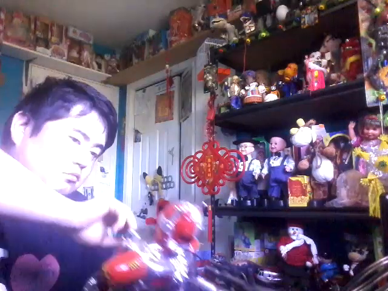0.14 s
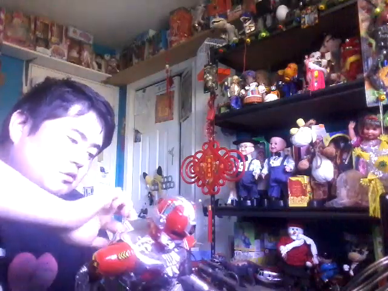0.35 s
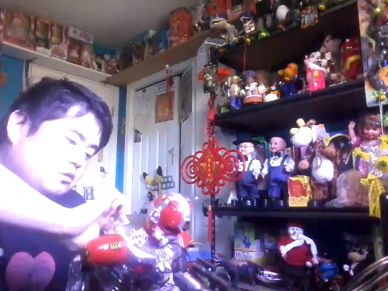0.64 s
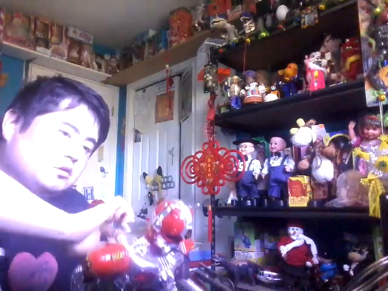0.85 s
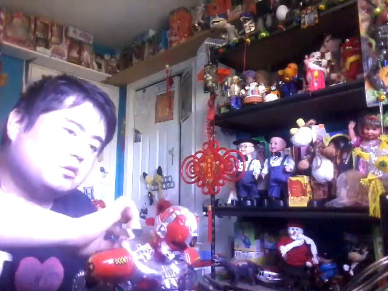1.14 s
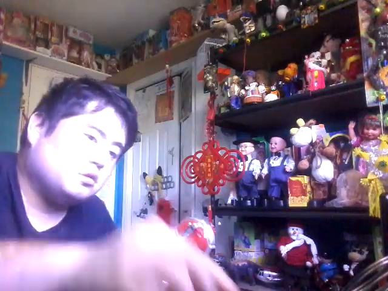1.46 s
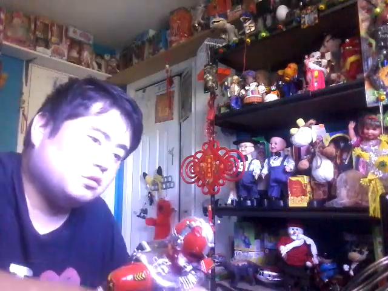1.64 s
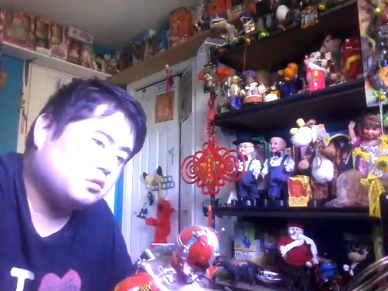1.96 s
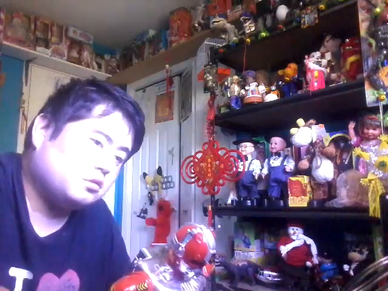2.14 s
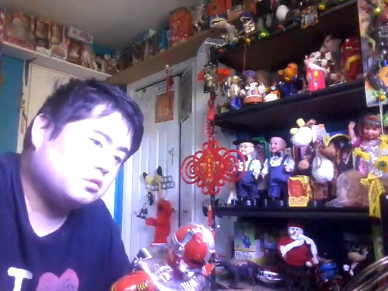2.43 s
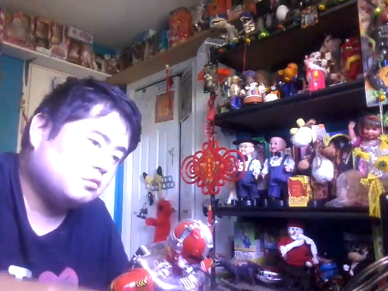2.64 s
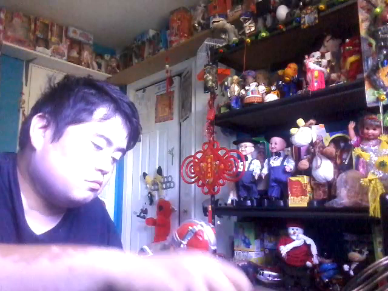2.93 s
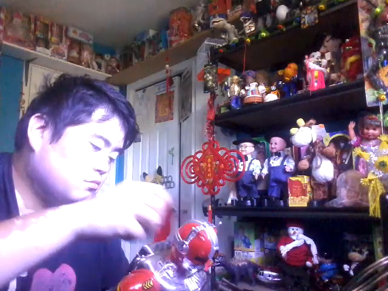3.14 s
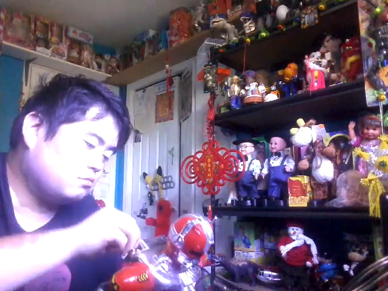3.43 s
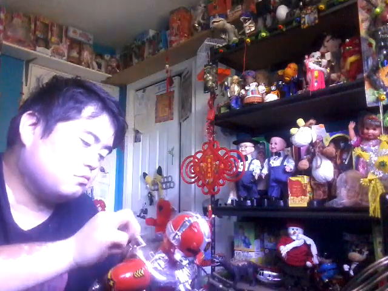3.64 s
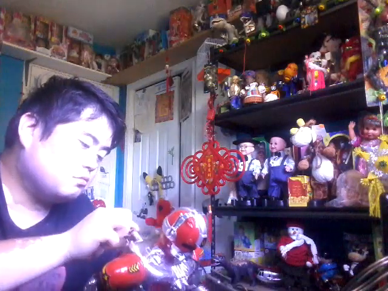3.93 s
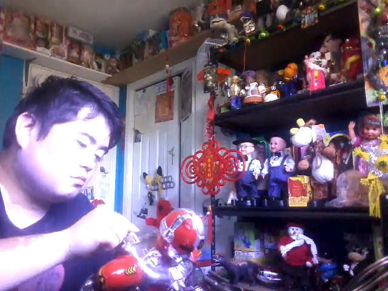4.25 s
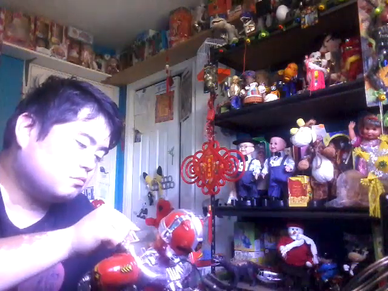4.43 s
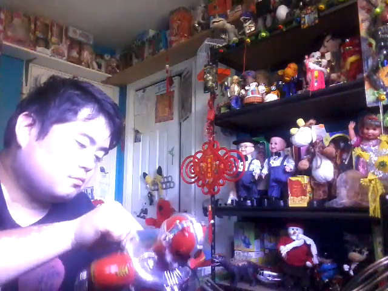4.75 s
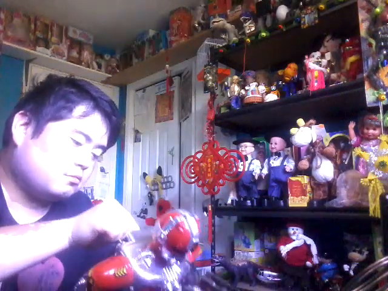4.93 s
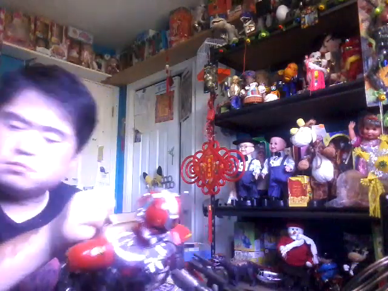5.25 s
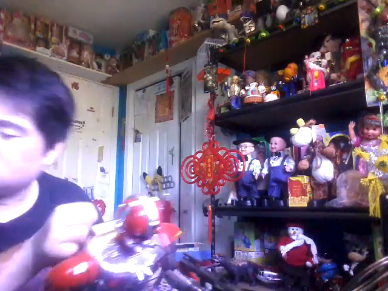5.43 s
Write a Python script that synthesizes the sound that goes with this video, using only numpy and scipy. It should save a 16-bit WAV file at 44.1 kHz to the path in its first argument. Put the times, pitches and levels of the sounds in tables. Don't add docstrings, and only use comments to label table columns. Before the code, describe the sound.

Close plastic snaps, clacks and small springy ticks at a desk, with a brief knocking roll midway and constant whirring fan noise.

```python
import sys
import numpy as np
from scipy import signal
from scipy.fft import rfft, irfft, next_fast_len
from scipy.io import wavfile

SR = 44100
rng = np.random.default_rng(int(sys.argv[2]) if len(sys.argv) > 2 else 0)


def gain_from_db(level_db):
    decades = np.asarray(level_db, float) / 20
    return 10 ** decades


def unload_audio(sound):
    columns = np.transpose(np.atleast_2d(sound))
    steps = np.round(np.clip(columns, -1, 1) * 32767)
    wavfile.write(sys.argv[1], SR, steps.astype(np.int16))


N = 246283

# freq_hz, density_db_per_hz
SIDE_HISS = [(59, -35), (100, -6), (818, -7.5), (1950, -4.5), (2220, -2), (2690, -2.5), (8640, -12),
             (16000, -12)]
SIDE_DB = -77
# freq_hz, density_db_per_hz
AIR = [(35, -27), (60, -14), (130, -9), (400, -10), (620, -7), (810, -3), (980, -11), (2250, -13),
       (3500, -18.5), (6650, -26.5), (8000, -22.5), (9200, -24), (10500, -46), (15000, -34.5)]
AIR_DB = -52
# time_s, speed_turns_per_s
SHAFT = [(0, 38.31), (2.7, 38.47), (4, 38.55), (5.6, 38.6)]
TONE_ORDERS = [(0, 3), (1, 0), (1, 1), (1, 2), (2, -1), (0, 6), (2, 1), (0, 9), (3, 0), (3, 1), (3, 2),
               (4, -1), (0, 12),
               (4, 2), (5, -1), (0, 16), (6, -1), (5, 3), (0, 21), (0, 54), (0, 58), (0, 60), (0, 2.627),
               (2, 0)]
TONE_DB = [-65, -60.5, -64, -73.5, -68.5, -72, -74, -60, -68.5, -72, -67.5, -65.5, -65, -80, -69, -73,
           -72.5, -68.5, -59, -70, -76, -65, -77.5, -73]
WHINE_DB, WHINE_SAG_DB_PER_S = -59.5, 1.7
WHINE_DROPS_S, WHINE_LOSS_DB, WHINE_FADE_S = 3.3, 15, .6
TURN_S, TURN_DB, TURN_SWELL_DB_PER_S, TURN_EASE_DB_PER_S = 5.45, -72, 12, 25

# freq_hz, t60_s
ROOM_T60_S = [(300, 0.29), (1500, 0.2), (5000, 0.22), (10000, 0.26), (15000, 0.14)]
# freq_hz, level_db
ROOM_TINT_DB = [(200, 2), (1000, 5.5), (3000, 8.5), (6500, 3.5), (9000, 4), (11000, 7.5), (15000, 4)]
PORT_HZ, SHELF_HZ = 9900, 12100

ROLL_S = [
    1.93,
    2.1,
    2.24,
    2.42,
]
RUMBLE_DB, RUMBLE_SWING_DB = -40.5, 6
SCRAPE_DB, SCRAPE_SWING_DB = -46, 30
# freq_hz, level_db, t60_s
RUMBLE_MODES = [(122, -5, 0.063), (218, -1, 0.09), (343.3, 1.5, 0.29), (480, -15, 0.019), (635, -6, 0.051),
                (800, -11, 0.035)]
# freq_hz, level_db, t60_s
DESK_MODES = [(260, -19, .02), (345, 11, 0.017), (545, 4, 0.096), (643, 8.5, 0.03), (870, 7, 0.016),
              (1080, 6, 0.059), (1280, 15, 0.0015), (2040, 11, 0.0096), (2020, -4, 0.021),
              (2630, -27, 0.0052), (3370, -6, 0.0017), (5000, -3.5, 0.002), (6400, -2.5, 0.0017),
              (8900, -7, 0.0033)]
# freq_hz, level_db, t60_s
SPRING_MODES = [(620, -11, 0.017), (1010, -9, 0.073), (1940, 4, 0.0054), (2780, 4, 0.011), (3310, 2, .01),
                (4050, 6, 0.0021), (5150, 2.5, 0.012), (5950, -0.5, 0.0092), (6230, 2, 0.0034),
                (8020, 12, 0.0033), (8830, 6.5, 0.012), (10400, 2, .002), (13800, -12, 0.0022)]
# freq_hz, level_db, t60_s
SHELL_MODES = [(413, -1.5, 0.029), (562, -16.5, 0.14), (720, 0, 0.023), (850, -1.5, 0.053),
               (1040, 0, 0.042), (1280, 4, 0.011), (1674, 5.5, 0.016), (1684, 4.5, 0.024), (1885, 2, 0.013),
               (2330, 11.5, 0.0021), (2590, 4.5, 0.0053), (3620, 8.5, 0.0028), (3785, 6.5, 0.0057),
               (5100, 4.5, 0.0063), (5110, 2.5, 0.012), (5740, 10.5, 0.0011), (8300, 18.5, 0.0014),
               (8050, 11, 0.0025), (8800, -10, 0.002), (11300, -11, 0.00033), (13600, 3, 0.0014),
               (16330, 7, 0.0033)]

# low_hz, high_hz
REGIONS_HZ = [(330, 1200), (1200, 3000), (3000, 17000)]
HARD_HZ = 14000
DULLING = 0.44
# region_peaks_re_strength_db, region_change_db_per_db_hardness, chatter_ms
KNOCK = ((0, 0, -6.5), (-0.55, 0.52, 0.32), .5)
THUD = ((0, -19.5, -22), (0, 0, 1), 4.9)
TICK = ((0, -19, 0), (-0.35, 0, 0), 4.3)
CLACK = ((0, 0, -11.5), (-1.45, 0, 0.59), 3.2)
SNAP = ((1.3, 0, 0), (-1.01, 0, 0.84), 4.55)
# start_s, strength_db, hardness_db, main_ring_hz
KNOCKS = [(1.9509, -44, -22, 770), (1.9634, -42, 18.5, 670), (1.9834, -44, -15, 594),
          (2.0006, -32.5, 7, 735), (2.0104, -34.5, -8, 780), (2.0224, -44, -12, 850),
          (2.0467, -37, -10, 720), (2.0645, -25, 1, 1050), (2.0715, -39, 3, 1100),
          (2.0892, -28.5, -9, 1080), (2.1065, -35, 0, 380), (2.1222, -40.5, 21, 1860),
          (2.1313, -38.5, 12, 1820), (2.1697, -37, -7, 1500), (2.184, -35, 11, 1490),
          (2.1945, -31.5, 1, 940), (2.23, -35.5, -1.5, 910), (2.24, -38, 7, 826), (2.2533, -47, -7, 384),
          (2.2845, -28.5, 6, 1300), (2.332, -36, 6, 1700), (2.3408, -32.5, 4, 920), (2.356, -65, -18, 345),
          (2.4956, -38.5, 3, 910), (2.6894, -50.5, -13, 800)]
# start_s, strength_db, hardness_db, main_ring_hz
THUDS = [
    (1.0486, -46, 33, 1010),
    (3.3374, -38, 7, 430),
    (3.6795, -33, 12, 480),
    (3.6863, -39, 3, 1020),
    (3.7018, -34.5, 11, 840),
    (3.8876, -47, 8, 850),
    (4.4414, -50, 9, 1080),
    (4.9794, -41, 16, 660),
    (5.4465, -35.5, 10, 720),
    (5.5554, -38, 0, 835),
]
# start_s, strength_db, hardness_db, main_ring_hz
TICKS = [(.4334, -46, 7, 5000), (.7195, -34.5, 13, 4570), (.7497, -37, 5.5, 5340), (.9918, -33.5, 19, 5500),
         (1.0014, -38, 12, 2900), (1.01, -31.5, 16, 5150), (1.029, -35, 10, 5370), (1.0622, -32, 18, 5070),
         (1.4962, -35.5, 25, 5700), (4.227, -44, 6, 3300), (4.2552, -37, 19, 4970),
         (5.335, -42.5, 20, 8300), (5.5333, -41, 10, 4700)]
# start_s, strength_db, hardness_db, main_ring_hz
CLACKS = [(3.5937, -24, 7, 1570), (3.5985, -27.5, 5, 1790), (3.645, -28.5, 7.5, 1810),
          (3.6565, -27, 3.5, 1770), (4.058, -39.5, 2, 990), (4.2195, -38.5, 16, 980),
          (4.3258, -32, 20, 3240), (4.3867, -37, 8, 1130), (4.4785, -28.5, -3, 944),
          (4.7076, -30, 7.5, 2040), (4.784, -40, 17, 1010), (5.5675, -34.5, 26.5, 2100)]
# start_s, strength_db, hardness_db, main_ring_hz
SNAPS = [(.1417, -28, 5.5, 4900), (.2607, -15, 12, 1680), (.3994, -44.5, 0.5, 800),
         (3.1467, -39, -0.5, 1080), (3.156, -47.5, -5.5, 1080), (3.2991, -28, -3.5, 2150),
         (4.3938, -30, 9.5, 2120), (4.4668, -25.5, 3, 1000), (4.4715, -25, 8, 750),
         (4.4845, -26, 17.5, 4550), (4.5551, -38, 3, 2280), (4.6982, -42, 9, 1040)]


def at_hz(points, hz):
    table_hz, value = np.transpose(points)
    return np.interp(np.log(hz), np.log(table_hz), value)


def in_time(rows):
    return np.interp(np.arange(N) / SR, *np.transpose(rows))


def drift(rate_hz):
    hop = 40
    pole = np.exp(-2 * np.pi * rate_hz * hop / SR)
    noise = rng.standard_normal(N // hop + 2002)
    slow = signal.lfilter([1], [1, -2 * pole, pole * pole], noise)[2000:]
    return np.interp(np.arange(N) / hop, np.arange(len(slow)), slow / slow.std())


def coloured(spectrum):
    size = next_fast_len(N)
    hz = np.maximum(np.arange(size // 2 + 1) * SR / size, 1)
    white = rfft(rng.standard_normal(size))
    noise = irfft(white * gain_from_db(at_hz(spectrum, hz)), size)[:N]
    return noise / noise.std()


def ring(force, hz, t60_s):
    r = gain_from_db(-60 / (t60_s * SR))
    w = 2 * np.pi * hz / SR
    return signal.lfilter([0, np.sin(w)], [1, -2 * r * np.cos(w), r * r], force + 1e-18)


def room(x):
    size = SR // 2
    t = np.arange(size) / SR
    edges_hz = 150 * 2. ** np.arange(0, 7, .5)
    tail = 0
    for low_hz, high_hz in zip(edges_hz, edges_hz[1:]):
        band_pass = signal.butter(2, [low_hz, high_hz], "band", fs=SR, output="sos")
        band = signal.sosfilt(band_pass, rng.standard_normal(size))
        hz = np.sqrt(low_hz * high_hz)
        decay_db = at_hz(ROOM_TINT_DB, hz) - 60 * t / at_hz(ROOM_T60_S, hz)
        tail = tail + band * gain_from_db(decay_db)
    tail = tail * np.clip((t - .001) / 0.00043, 0, 1)
    return signal.fftconvolve(x, tail / np.sqrt(np.sum(tail ** 2)))[:N]


def capsule(x):
    x = signal.sosfilt(signal.butter(2, 260, "high", fs=SR, output="sos"), x)
    x = signal.sosfilt(signal.cheby2(10, 50, 16600, fs=SR, output="sos"), x)
    poles = signal.butter(5, PORT_HZ, fs=SR, output="zpk")[1]
    zeros = signal.butter(5, SHELF_HZ, fs=SR, output="zpk")[1]
    unity_gain = np.real(np.prod(1 - poles) / np.prod(1 - zeros))
    return signal.sosfilt(signal.zpk2sos(zeros, poles, unity_gain), x)


def fan_air():
    top = signal.cheby2(10, 50, 16300, fs=SR, output="sos")
    noise = signal.sosfilt(top, coloured(AIR))
    low = signal.sosfilt(signal.butter(1, 1200, fs=SR, output="sos"), noise)
    low_gusts = low * gain_from_db(1.3 * drift(10))
    high_gusts = (noise - low) * gain_from_db(.5 * drift(11.0))
    return gain_from_db(AIR_DB) * (low_gusts + high_gusts)


def fan_tones():
    t = np.arange(N) / SR
    turns = np.cumsum(in_time(SHAFT) + 0.017 * drift(1.43)) / SR
    left = np.clip((t - WHINE_DROPS_S) / WHINE_FADE_S, 0, 1)
    whine_db = WHINE_DB - WHINE_SAG_DB_PER_S * t - WHINE_LOSS_DB * left
    out = gain_from_db(whine_db + 1.5 * drift(5.0)) * np.sin(2 * np.pi * 57 * turns)
    for (hum, order), db in zip(TONE_ORDERS, TONE_DB):
        waver_db = 0.57 * drift(2.5) * (order != 0)
        cycles = 119.9 * hum * t + order * turns + rng.random()
        out += gain_from_db(db + waver_db) * np.sin(2 * np.pi * cycles)
    return np.sqrt(2) * out


def rustle():
    grains = rng.standard_normal(N) * (rng.random(N) < 3000 / SR)
    bright = signal.butter(1, [2500, 12000], "band", fs=SR, output="sos")
    grains = signal.sosfilt(bright, grains)
    late_s = np.arange(N) / SR - TURN_S
    swell_db = TURN_DB + np.minimum(TURN_SWELL_DB_PER_S * late_s, -TURN_EASE_DB_PER_S * late_s)
    return gain_from_db(swell_db + 3.1 * drift(12.0)) * grains / grains.std()


def rolling():
    speed = np.interp(np.arange(N) / SR, ROLL_S, (0, 1, 1, 0))
    grit = rng.standard_normal(N) * (rng.random(N) < 900 / SR)
    soft = signal.butter(2, [90, 2800], "band", fs=SR, output="sos")
    layers = ((RUMBLE_DB, RUMBLE_SWING_DB, RUMBLE_MODES), (SCRAPE_DB, SCRAPE_SWING_DB, DESK_MODES[4:10]))
    out = 0
    for full_db, swing_db, modes in layers:
        rung = 0
        for k, (hz, db, t60_s) in enumerate(modes):
            rung = rung + (-1) ** k * gain_from_db(db) * ring(grit, hz, t60_s)
        sound = signal.sosfilt(soft, rung)
        level_db = full_db - swing_db * (2 - speed)
        out = out + (speed > 0) * gain_from_db(level_db) * sound / sound.std()
    return out


def touches(rows, kind):
    balance_db, lean, chatter_ms = kind
    events = []
    for start_s, strength_db, hardness_db, hz in rows:
        peaks_db = strength_db + np.array(balance_db) + hardness_db * np.array(lean)
        events.append((start_s, *peaks_db, hz, chatter_ms))
    return events


def push(chatter_ms, tick_db, size):
    ms = np.arange(size) * 1000 / SR
    luck, touch = rng.standard_normal(size), rng.random(size)
    force = np.zeros((2, size))
    force[0] = luck * (touch < .2) * np.exp(-ms / max(chatter_ms, .2))
    force[:, 0] = 3.2
    bandwidth_hz = HARD_HZ * gain_from_db(DULLING * (tick_db + 12.5))
    soft = np.exp(-2 * np.pi * bandwidth_hz / SR)
    return signal.lfilter([1 - soft], [1, -soft], force)


def contacts(events, modes, main_db, main_cycles):
    size = 2560
    out = np.zeros((2, N + size))
    regions = [signal.butter(2, edges, "band", fs=SR, output="sos") for edges in REGIONS_HZ]
    for start_s, *peaks_db, main_hz, chatter_ms in events:
        force = push(chatter_ms, peaks_db[2], size)
        strength = rng.standard_normal(len(modes))
        body = gain_from_db(main_db) * ring(force, main_hz, main_cycles / main_hz)
        for k, ((hz, db, t60_s), chance) in enumerate(zip(modes, strength)):
            sign = (-1) ** k
            body[0] += sign * gain_from_db(db + 2.5 * chance) * ring(force[0], hz, t60_s)
            body[1] += sign * gain_from_db(db + 4) * ring(force[1], hz, .6 * t60_s)
        at = round(start_s * SR)
        for region, peak_db, sign in zip(regions, peaks_db, (1, -1, 1)):
            direct, around = signal.sosfilt(region, body)
            around = around * direct.std() / around.std()
            gain = sign * gain_from_db(peak_db) / np.abs(direct).max()
            out[:, at:at + size] += gain * np.array([direct, around])
    return out[:, :N]


def desk_knocks():
    return contacts(touches(KNOCKS, KNOCK), DESK_MODES, main_db=16, main_cycles=12)


def toy_contacts():
    shell = touches(SNAPS, SNAP) + touches(CLACKS, CLACK) + touches(THUDS, THUD)
    shell_sound = contacts(shell, SHELL_MODES, main_db=6, main_cycles=28)
    return shell_sound + contacts(touches(TICKS, TICK), SPRING_MODES, main_db=5, main_cycles=31)


def scene():
    fan = fan_tones() + fan_air()
    desk, desk_around = desk_knocks()
    toy, toy_around = toy_contacts()
    handling = toy + desk + room(gain_from_db(-4.0) * toy_around + gain_from_db(-9.0) * desk_around)
    mono = capsule(gain_from_db(1.0) * handling + rustle()) + rolling() + fan
    return np.array([mono, mono])


def low_pass(x):
    return signal.sosfilt(signal.butter(12, 16790, fs=SR, output="sos"), x)


def record(dry):
    side = gain_from_db(SIDE_DB) * coloured(SIDE_HISS) * [[1], [-1]]
    mix = dry + side - .0006
    return low_pass(mix)


dry = scene()
out = record(dry)
unload_audio(out)
```